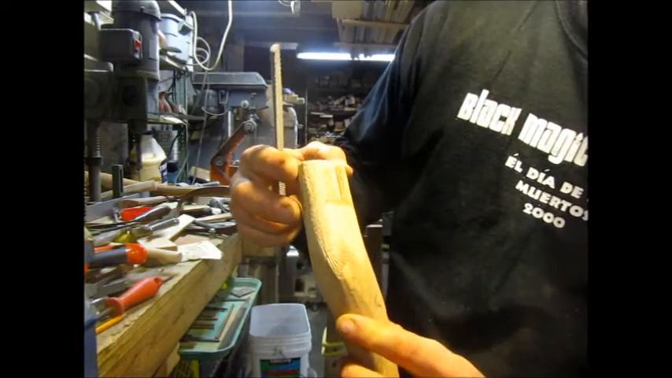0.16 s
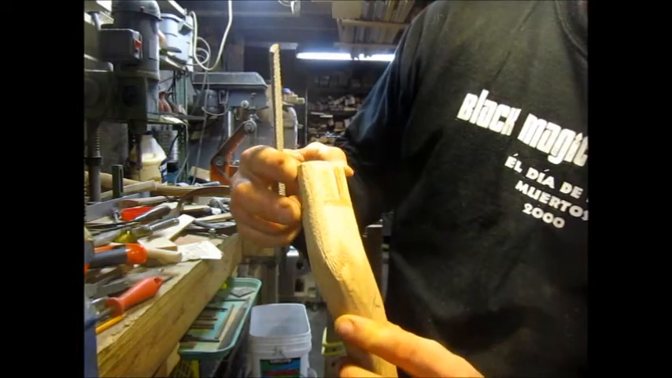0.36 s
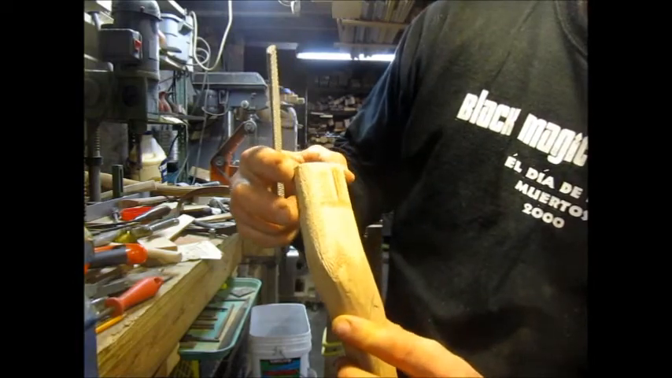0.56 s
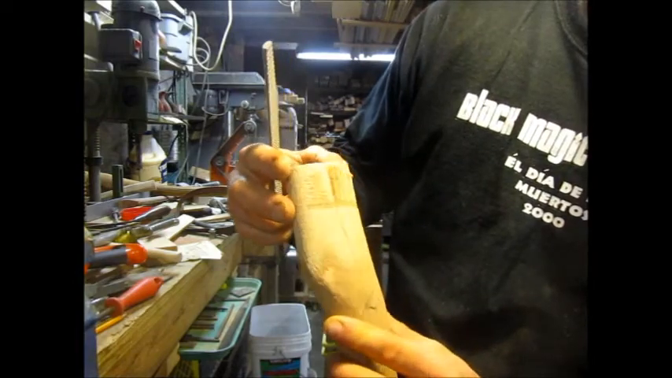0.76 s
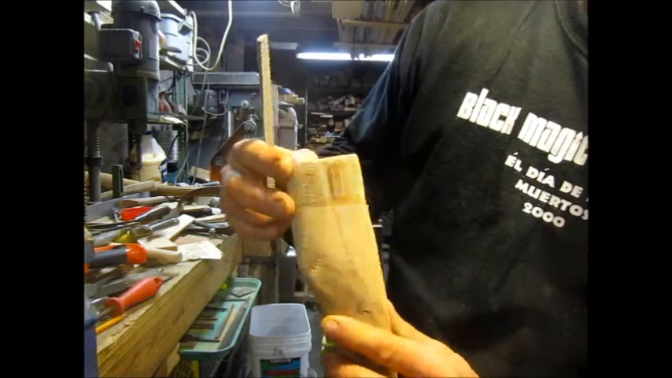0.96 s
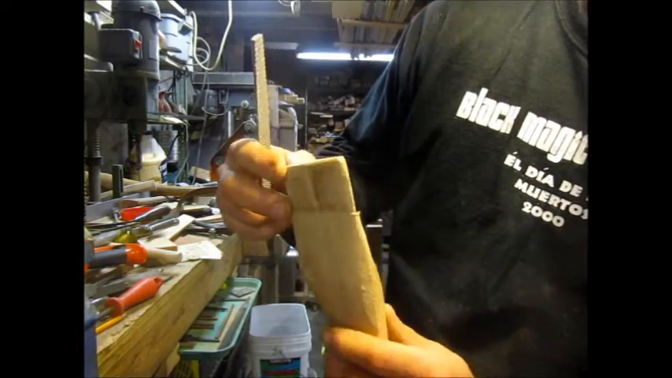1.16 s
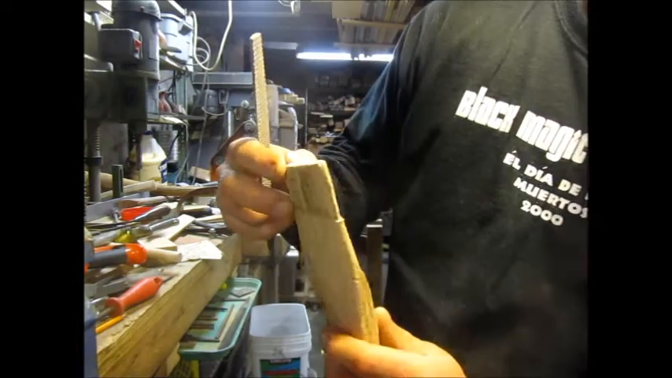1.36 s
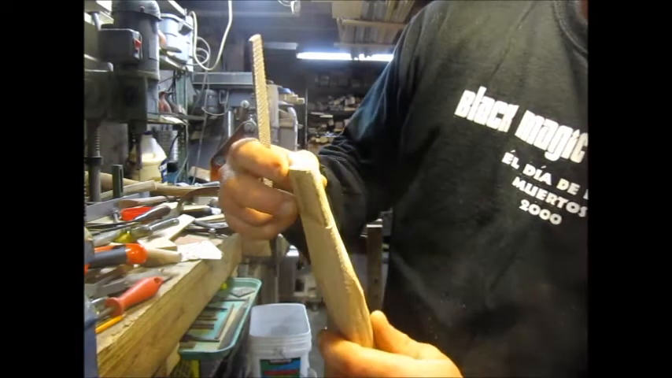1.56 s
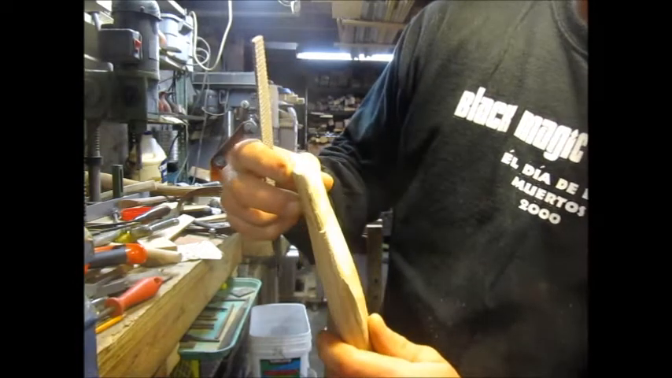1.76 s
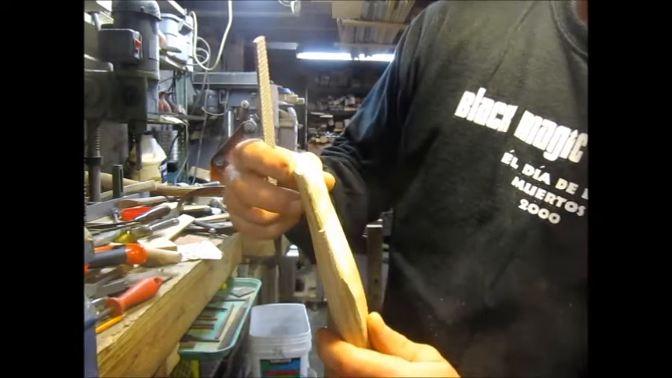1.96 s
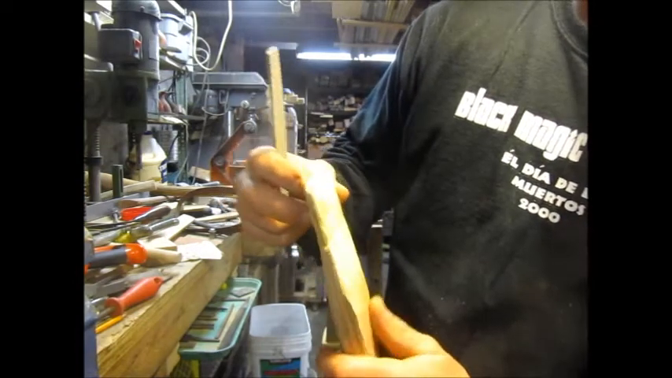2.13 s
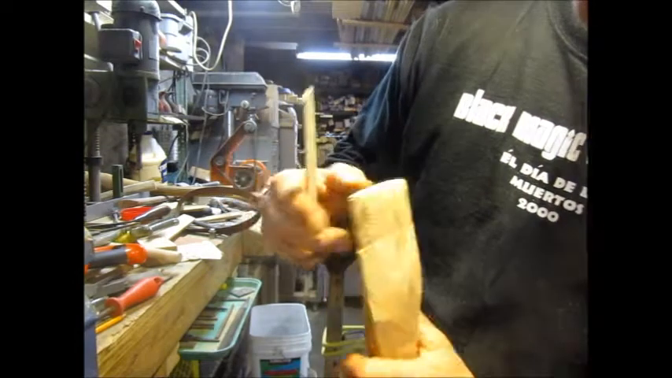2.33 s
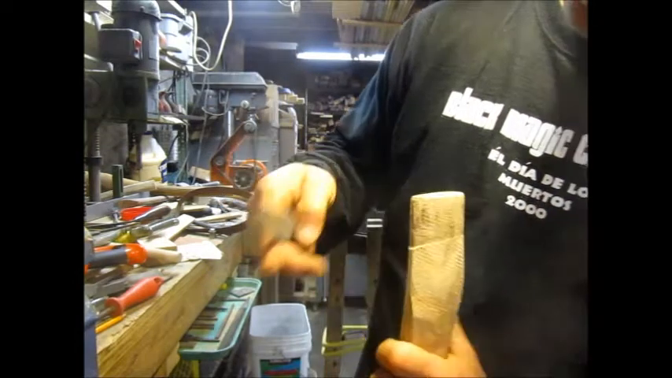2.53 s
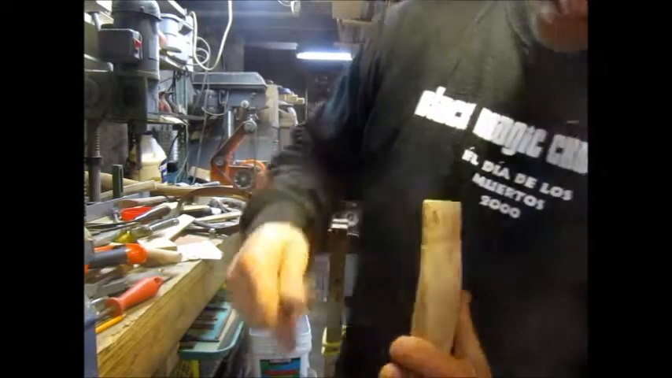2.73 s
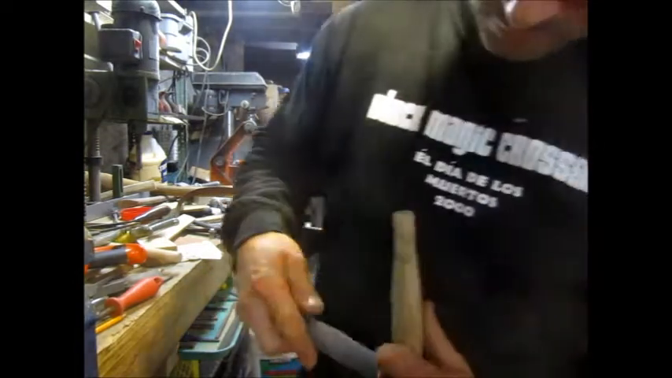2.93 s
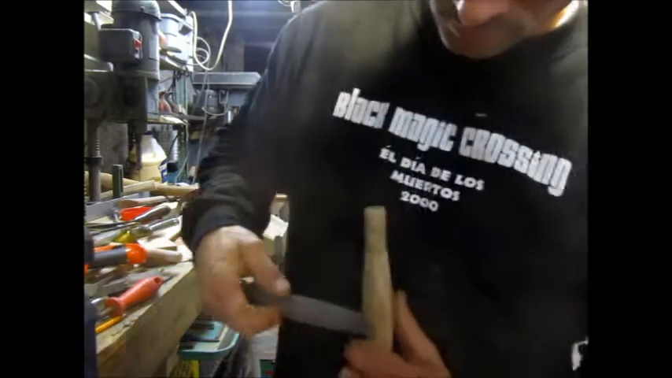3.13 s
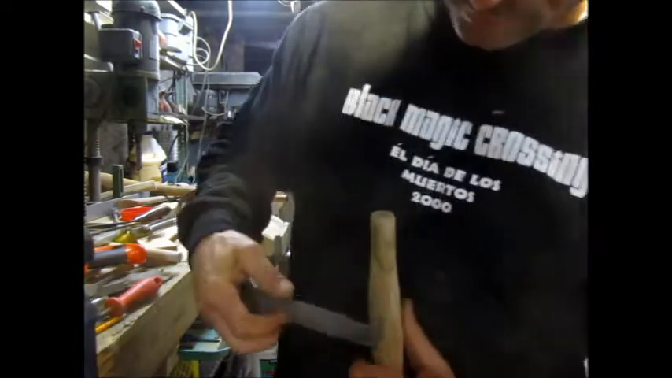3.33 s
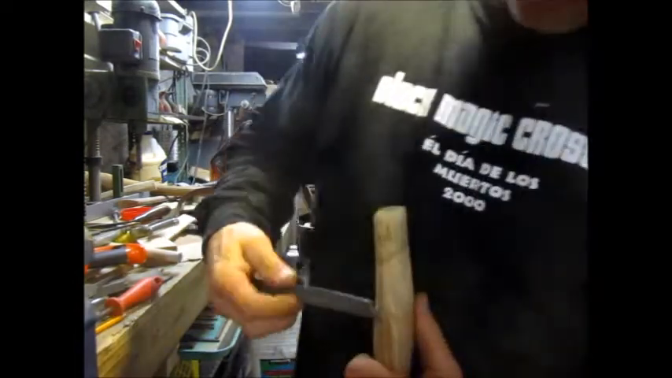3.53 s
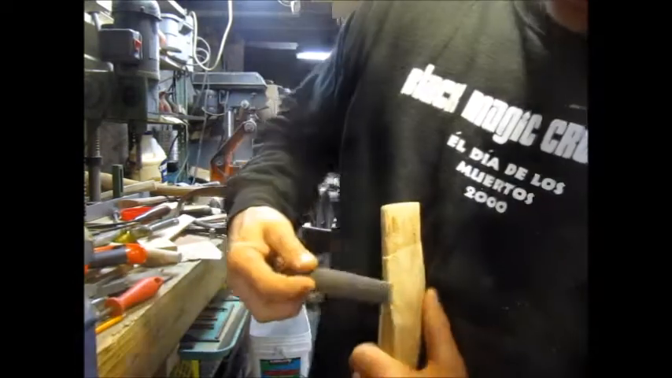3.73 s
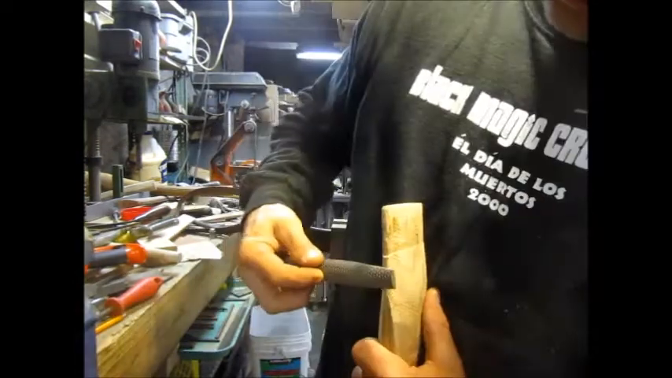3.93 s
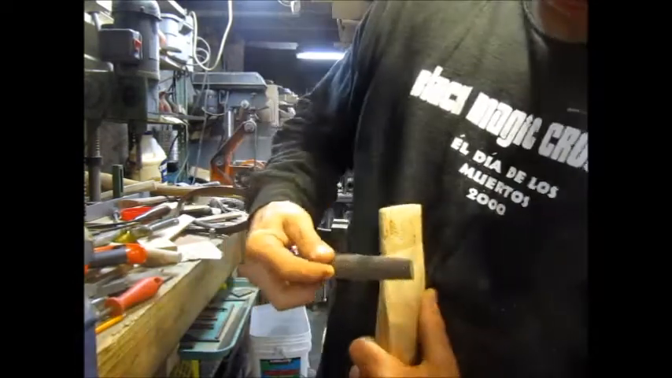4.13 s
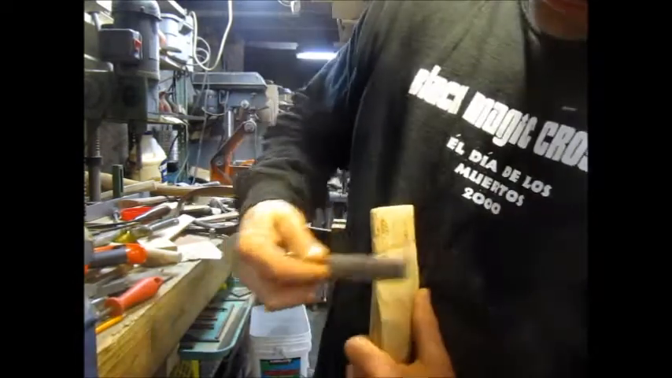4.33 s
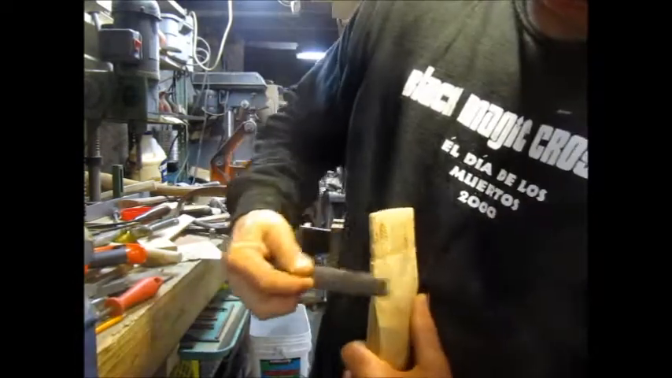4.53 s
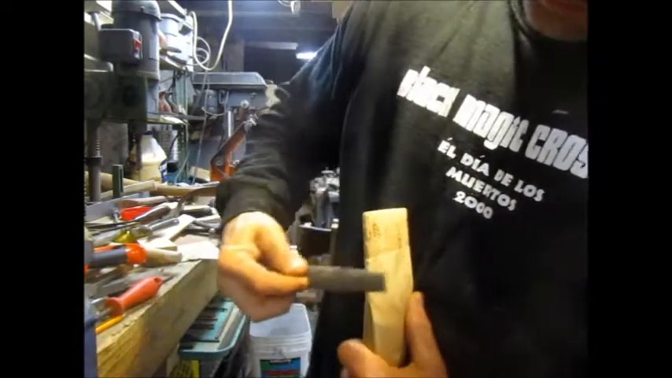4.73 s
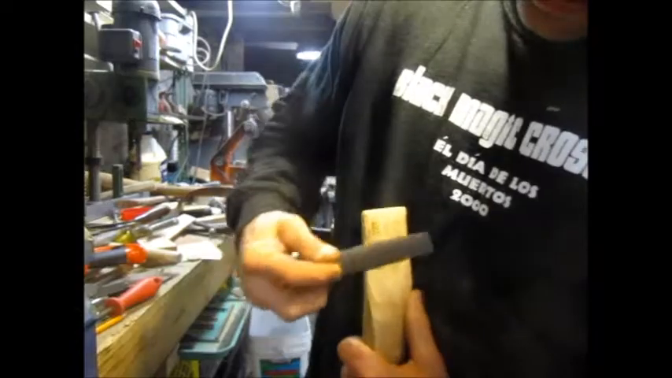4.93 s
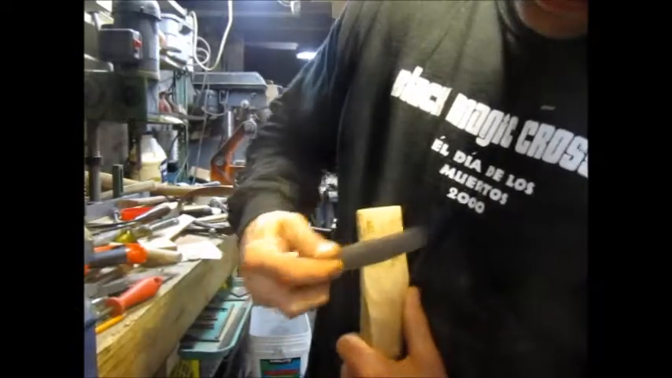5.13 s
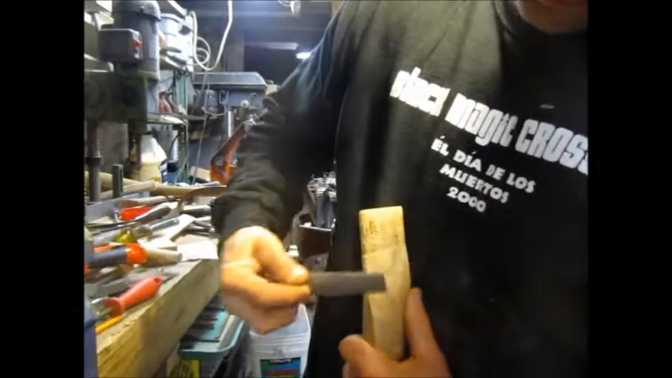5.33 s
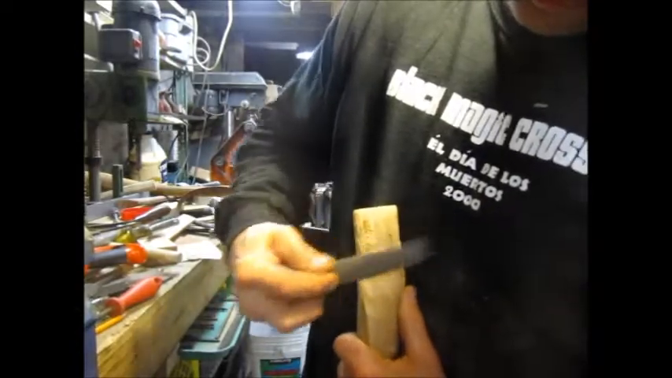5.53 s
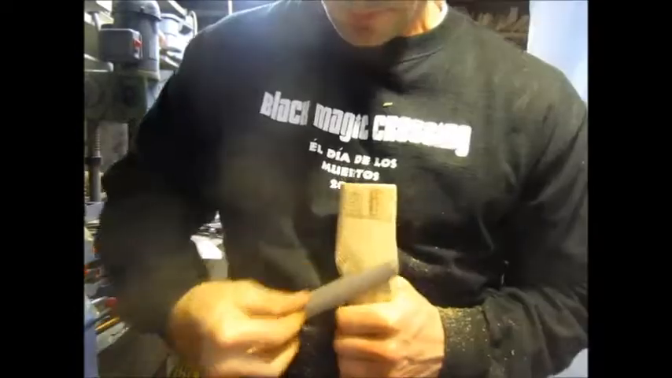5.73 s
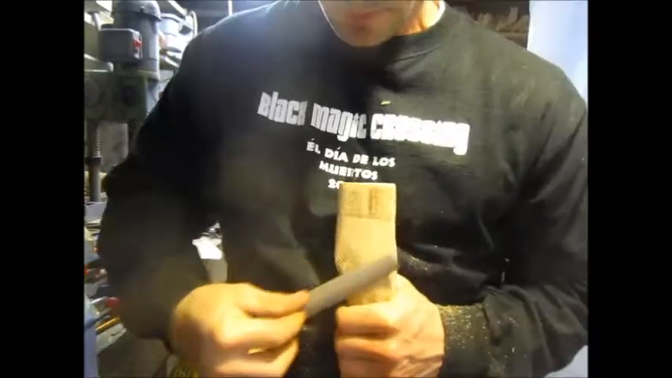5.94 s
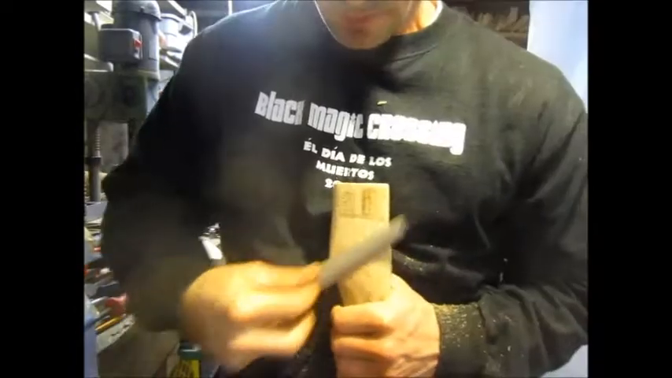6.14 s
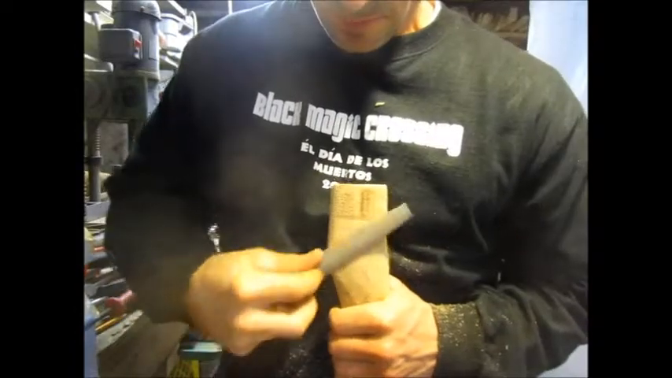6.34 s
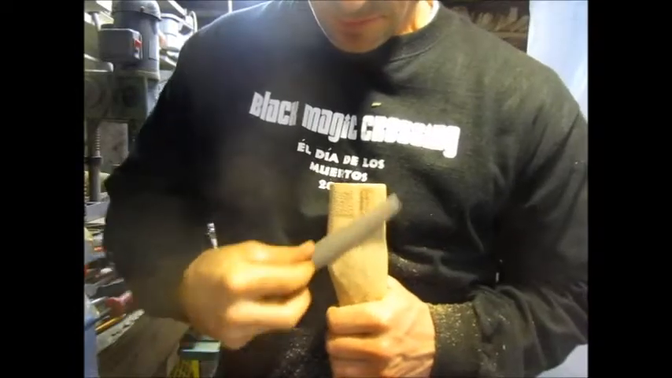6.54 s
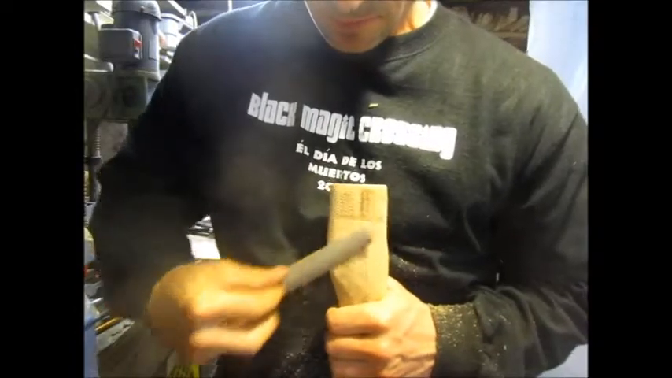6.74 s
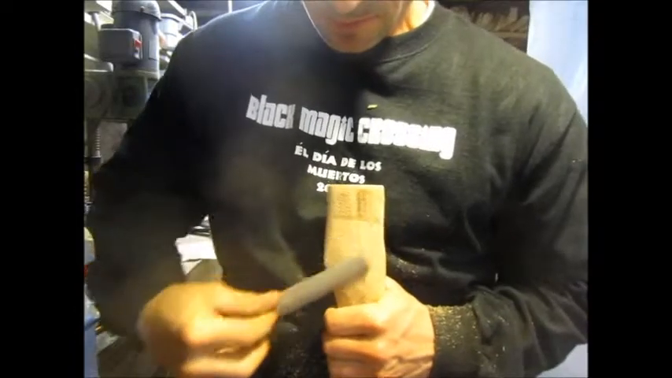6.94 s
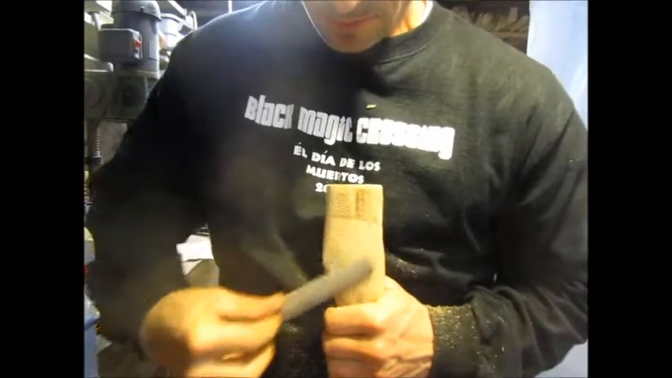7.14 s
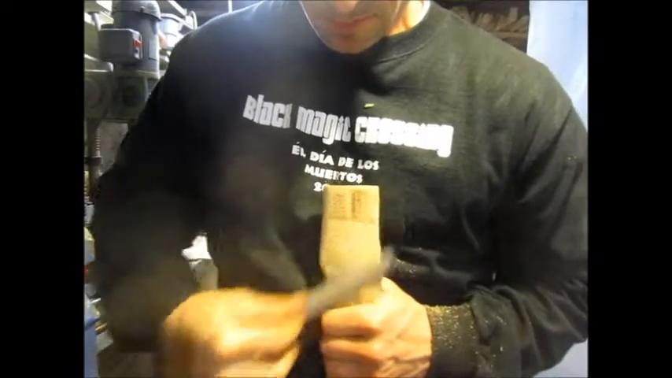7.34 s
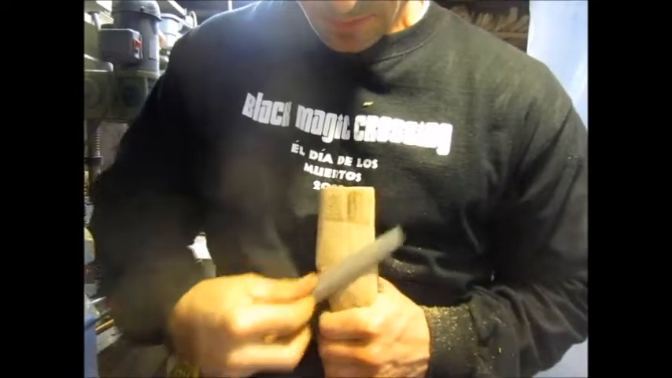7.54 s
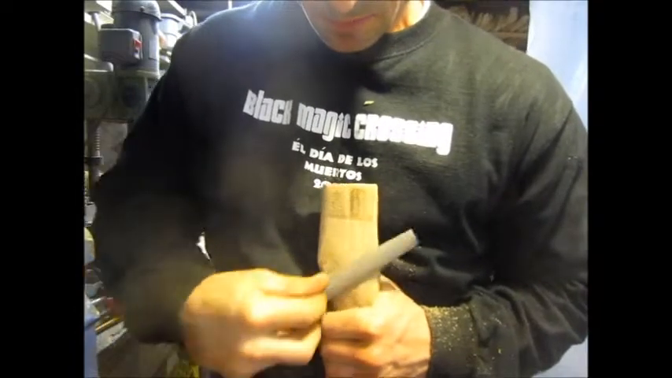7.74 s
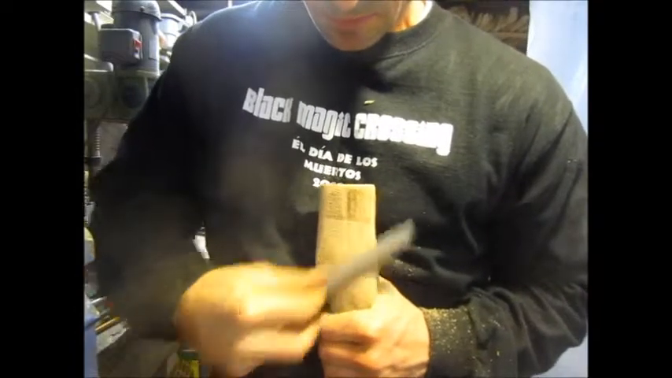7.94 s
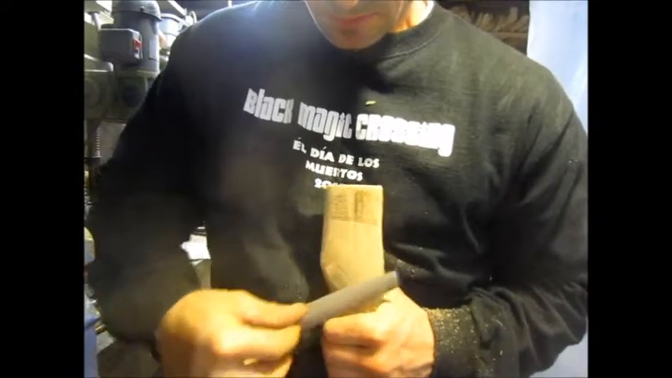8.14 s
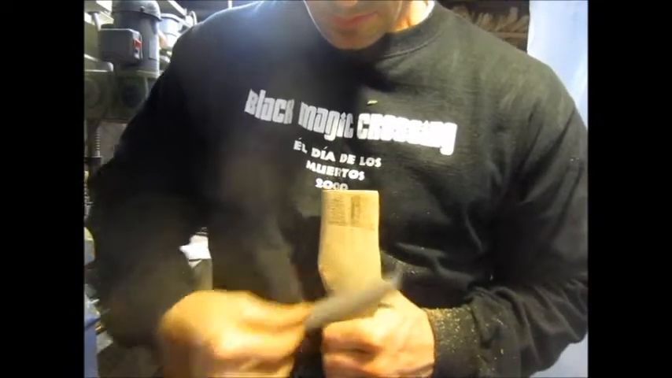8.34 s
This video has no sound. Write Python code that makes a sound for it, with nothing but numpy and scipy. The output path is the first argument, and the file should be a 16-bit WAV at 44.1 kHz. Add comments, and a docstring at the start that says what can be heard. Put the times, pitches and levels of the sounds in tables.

```python
"""A hand file shapes the end of a hand-held wooden handle in a small, cluttered workshop with a steady background.
First a sleeve rustles by cloth friction, the file is slapped and wiped on clothing, and its free blade sings.
Then come slow strokes that judder by coarse stick-slip, with single teeth catching and letting go.
Last, with a firmer grip, quick strokes rasp to and fro, dull on the pull and bright on the push.
Teeth and torn fibres excite resonances of wood and blade; file and cloth alike reflect off the clutter."""
import sys
import numpy as np
from scipy import signal
from scipy.fft import rfft, irfft
from scipy.io import wavfile

SR = 44100
rng = np.random.default_rng(int(sys.argv[2]) if len(sys.argv) > 2 else 0)


def master(y):
    """Save y as 16-bit WAV."""
    cut = np.clip(np.atleast_2d(y).T, -1, 1)
    pcm = np.round(cut * 32767)  # scale
    wavfile.write(sys.argv[1], SR, pcm.astype(np.int16))


N = 374497
TIME = np.arange(N) / SR
BINS = np.fft.rfftfreq(4096, 1 / SR)


def amp(db):
    """Decibel law: level difference to amplitude ratio."""
    return 10 ** (np.asarray(db) / 20)


def unit(x):
    """Normalisation: scales to rms 1."""
    return x / np.sqrt(np.mean(x ** 2) + 1e-20)


def read(points, hz):
    """Interpolation of a spectrum along a logarithmic frequency axis."""
    f, value = np.transpose(points)
    return np.interp(np.log(hz + 1), np.log(f + 1), value)


def add(mix, s, sound):
    """Superposition: adds a sound at time s."""
    part = mix[round(s * SR):][:len(sound)]
    part += sound[:len(part)]


def tinted(x, points):
    """Linear filtering: weights the spectrum of x by a dB curve."""
    gain = amp(read(points, np.fft.rfftfreq(len(x), 1 / SR)))
    return irfft(rfft(x) * gain, len(x))


def wander(n, step):
    """Slow random modulation of rms 1: straight lines between chance values every step points."""
    knots = rng.standard_normal(n + 2)
    return unit(np.interp(np.arange(n) / step, np.arange(n + 2), knots))


def response(db):
    """Minimum phase: the causal impulse response, of energy 1, whose gain over BINS has this dB shape."""
    log_gain = np.log(amp(np.r_[db, db[-2:0:-1]]))
    spectrum = np.exp(np.conj(signal.hilbert(log_gain)))[:len(db)]
    h = irfft(spectrum)
    return h / np.linalg.norm(h)


def bump(hz, width, db):
    """Resonance: dB shape of one peak, half as high at half a width to either side."""
    return db / (1 + (2 * (BINS - hz) / width) ** 2)


# workshop background, spectrum: (frequency [Hz], density [dB per Hz])
AIR_SPECTRUM = [(15, -51), (25, -37), (44, -6.5), (112, 0.5), (142, -6), (167, -2.5), (257, -3), (475, -6),
                (1420, -14.5), (2500, -18.5), (2700, -18.5), (4040, -31), (7890, -31), (12800, -60),
                (15000, -66)]
# stereo width of the background: (frequency [Hz], side against mid [dB])
AIR_WIDTH = [(60, -2.5), (150, 12), (380, 9), (950, 5), (2380, 1.5), (5980, 4), (15000, 0)]


def air(level_db=-54.5):
    """Diffuse field: steady workshop background of coloured noise, wide in the bass."""
    mid, side = (unit(tinted(rng.standard_normal(N), AIR_SPECTRUM)) for _ in range(2))
    side = tinted(side, AIR_WIDTH)
    return np.array([mid + side, mid - side]) * amp(level_db)


# reverberation: (frequency [Hz], time to fall by 60 dB [s])
DECAY_TIMES = [(200, 0.22), (530, 0.24), (1400, 0.2), (3700, 0.21), (9700, 0.16)]


def tail(gap_s=0.0033):
    """Reverberant decay: dense reflections off the clutter, each band dying at its own speed."""
    hz, t, z = signal.stft(rng.standard_normal(SR // 2), SR, nperseg=256)
    fall_db = -60 * t / read(DECAY_TIMES, hz)[:, None]
    h = signal.istft(z * amp(fall_db), SR, nperseg=256)[1]
    h = h * (np.arange(len(h)) / SR > gap_s)
    return h / np.linalg.norm(h)


# stereo width of the reflections: (frequency [Hz], side against mid before the side level [dB])
REFLECTION_WIDTH = [(100, -17), (300, -5.5), (700, -14), (1500, -5.5), (4000, -2), (9000, 4), (14000, 8)]


def room(x, wet_db, side_db, pan_db):
    """Reverberation: direct sound plus reflections at two close microphones."""
    mid = x + amp(wet_db) * signal.fftconvolve(x, tail())[:N]
    side = amp(side_db) * signal.fftconvolve(x, tinted(tail(), REFLECTION_WIDTH))[:N]
    return np.array([amp(pan_db / 2) * (mid + side), amp(-pan_db / 2) * (mid - side)])


# colour of rubbed cloth: (frequency [Hz], density [dB per Hz])
RUSTLE_SPECTRUM = [(150, 3), (600, 4), (2800, 2.5), (3900, -8), (5500, -1), (8500, -6.5), (11000, -16.5),
                   (14000, -30)]
# arm movements, bell-shaped swells: (middle [s], length of two standard deviations [s], relative level [dB])
ARM_MOVES = [(.9, 1.0, -62.5), (2.11, 0.12, -55), (2.22, 0.048, -56), (2.602, 0.86, -57),
             (3.123, 0.11, -53), (3.454, .25, -64.5), (5.413, 0.74, -54), (7.3, 5.9, -56)]


def sleeve(flutter_db=1, grain_db=1.5, rest_db=-72):
    """Friction noise: cloth rubs on cloth, swelling and fading with each move of the arm."""
    grains_db = grain_db * rng.standard_normal(N) + flutter_db * wander(N, 700)
    grains = rng.standard_normal(N) * amp(grains_db)
    power = amp(rest_db) ** 2  # an arm held almost still
    for middle, length, db in ARM_MOVES:
        swell = np.exp(-(2 * (TIME - middle) / length) ** 2 / 2)
        power = power + (amp(db) * swell) ** 2
    return unit(tinted(grains, RUSTLE_SPECTRUM)) * np.sqrt(power)


# partials of the free blade: (frequency [Hz], relative level [dB])
BLADE_PARTIALS = [(5954, -58), (7800, -64), (8764, -61), (9825, -65)]


def blade(level_db=1, waver_hz=50):
    """Free vibration: the blade sings faintly and unevenly as it slides through the fingers."""
    swell = np.interp(TIME, [2.56, 2.63, 2.648], [0, 1, 0])
    out = np.zeros(N)
    for hz, db in BLADE_PARTIALS:
        turns = np.cumsum(hz + waver_hz * wander(N, 120)) / SR
        out += amp(db + level_db + 2 * wander(N, 700)) * np.sin(2 * np.pi * turns)
    return swell * out


# resonances of handle and blade together: (frequency [Hz], width [Hz], lift [dB])
RESONANCES = [(385, 100, 1), (644, 97, 2), (737, 40, 4), (864, 47, 4.5), (1153, 130, 4), (1386, 60, 2.5),
              (1564, 14, 4.5), (1869, 45, 7.5), (2026, 230, 5), (2717, 110, 10), (2860, 114, 5),
              (3140, 67, 7), (3680, 73, 4.5), (4637, 143, 9.5), (4990, 240, 7.5), (5910, 230, 7),
              (7900, 200, 5.5), (8210, 200, 5), (9740, 1060, 9)]


def body(colour, drift=0.014):
    """Modal response: dB gain of handle and blade; the shifting grip detunes the low wooden modes most."""
    gain_db = read(colour, BINS)
    for hz, width, db in RESONANCES:
        detune = np.exp(drift * rng.standard_normal() * min(1, 900 / hz) ** 2)
        gain_db = gain_db + bump(hz * detune, width, db)
    return gain_db


# colour of struck cloth: (frequency [Hz], density [dB per Hz])
CLOTH_SPECTRUM = [(40, -15), (200, -14.5), (450, -7), (680, -1.5), (1100, 0.5), (1900, -1), (2250, -3),
                  (2800, -4), (3900, -16), (5500, -10), (9000, -10), (10500, -18.5), (13000, -23),
                  (16000, -54)]
# file against clothing: (time [s], rise [s], decay [s], relative level [dB])
CLOTH_BLOWS = [(1.618, 0.0078, .006, -51.5), (2.648, 0.039, 0.011, -40.5), (2.876, 0.0063, .004, -39),
               (2.8845, 0.00061, 0.007, -9.5), (3.166, 0.014, 0.02, -29), (3.378, 0.0056, 0.009, -50.5)]


def slaps(crack=5, spread_s=0.0032, ring_share=0.28):
    """Impact and dispersion: a sharp slap on cloth cracks the blade, a soft wipe rubs fibres; both ring the
    blade."""
    out, t = np.zeros(N), np.arange(SR // 4) / SR
    blade_db = ring_share * sum(bump(*mode) for mode in RESONANCES if mode[0] > 1000)
    # bending waves disperse in steel: the treble arrives first and the bass a moment later
    lag_s = spread_s / np.sqrt(1 + BINS / 900)
    flex = irfft(np.exp(-2j * np.pi * np.cumsum(lag_s) * BINS[1]))
    soft_tilt_db = read([(60, -14), (170, 8), (400, 6.5), (800, -3.5), (4000, 1), (14000, -14)], BINS)
    for s, rise, decay, db in CLOTH_BLOWS:
        softness = min(rise / 0.0093, 1)  # a slow rise is a soft contact
        shape = np.minimum(t / rise, 1) * np.exp(-np.maximum(t - rise, 0) / decay)
        blow = shape * rng.standard_normal(len(t)) * (0.77 + 0.3 * softness)
        add(blow, 0, crack * (1 - softness) * flex)
        ring = response(read(CLOTH_SPECTRUM, BINS) + blade_db + softness * soft_tilt_db)
        add(out, s, amp(db) * signal.fftconvolve(blow, ring))
    return out


# colour of the handle held loosely: (frequency [Hz], density [dB per Hz])
LOOSE_GRIP = [(50, -36), (110, -17), (165, -3), (260, 0.5), (660, -2), (900, -10.5), (1300, -11.5),
              (2400, -19.5), (4000, -22), (4900, -23), (8000, -18), (9000, -28), (10500, -29),
              (12500, -43.5), (15500, -66)]
# single teeth catching as the file lands or creeps: (time [s], relative level [dB])
TOOTH_CATCHES = [(3.975, -30.5), (4.002, -30.5), (4.439, -20.5), (4.642, -20.5), (4.664, -22.5),
                 (4.728, -27), (4.776, -20.5), (4.934, -19.5), (4.968, -26), (4.987, -15.5), (5.0, -14.5),
                 (5.068, -14), (5.216, -18.5), (5.238, -15.5), (5.275, -18.5), (5.316, -23), (5.476, -16.5),
                 (5.594, -22.5), (7.114, -18)]


def catches(level_db=16, grit_s=.002, hold_s=0.00323, grit=.09):
    """Stored strain released: a tooth digs in with a pinch of grit, holds, and lets go with a dull knock."""
    out, t = np.zeros(N), np.arange(600) / SR
    for s, db in TOOTH_CATCHES:
        hardness_db = -5.0 + .5 * (db + 20.5)  # light touches are duller
        tilt_db = read([(200, -3.5), (750, -0.5), (2500, -4.5), (8000, hardness_db)], BINS)
        ring = response(body(LOOSE_GRIP) + tilt_db)
        release = np.exp(-((t - hold_s) / .00008) ** 2) / 3
        crunch = grit * rng.standard_normal(len(t)) * (t / grit_s) ** 2 * np.exp(-t / grit_s)
        knock = signal.fftconvolve(release + crunch, ring)
        add(out, s, amp(db + level_db) * knock / np.linalg.norm(knock))
    return out


# the more blade juts past the wood, the more freely it rings: (time [s], lift [dB])
BLADE_OVERHANG = [(4, 2.5), (5.7, 0.5), (7.2, 2), (7.9, 4), (8.05, 6.5), (8.4, 3)]


def overhang(s):
    """Boundary condition: lift in dB of the free blade's ring at time s."""
    return np.interp(s, *np.transpose(BLADE_OVERHANG))


def bite(speed, breakaway=.45, held=0.6, jolt=0.07, jolt_s=0.016):
    """Static friction: the teeth hold until the hand overcomes it, then break free with a jolt."""
    since = (np.arange(len(speed)) - np.argmax(speed > breakaway)) / SR
    return np.where(since < 0, held * speed ** 2, speed ** 2 + jolt * np.exp(-abs(since) / jolt_s))


def stroke(start, length, peak, tone, colour, slip_hz, jitter, slip_share, snap_share, rub,
           grain_db, contact_db, spot_db, speed_db, chatter_db):
    """Stick-slip: in one pass, each slip thumps the wood and tears a clump of fibres."""
    presence_db, treble_db, spot_hz = tone
    n = int(length * SR)
    # peak is the moment of top speed as a share of the length
    speed = np.sin(np.pi * np.interp(np.arange(n) / n, [0, np.clip(peak, .1, .9), 1], [0, .5, 1]))
    slip_rate = slip_hz * (.5 + .5 * speed) * np.exp(jitter * wander(n, 90))
    cycles = np.cumsum(slip_rate) / SR + rng.random()
    slips = np.diff(np.floor(cycles), prepend=0) * amp(2 * rng.standard_normal(n))
    # a slip is soft: little treble
    thumps = unit(signal.lfilter(*signal.butter(1, 1500, fs=SR), slips)) * 0.28
    clumps = rub + np.exp(-(cycles % 1) / snap_share)
    fibres = unit(rng.standard_normal(n) * clumps * amp(grain_db * rng.standard_normal(n)))
    soft = signal.lfilter(*signal.butter(1, 2000, fs=SR), fibres)
    hiss = fibres - soft
    # faster teeth cut more sharply, so the treble swells in mid-stroke; it flares where fibres are brittle
    sharpness = amp(speed_db * (speed - 0.95) + wander(n, 186.0))
    drive = np.sqrt(slip_share) * thumps + np.sqrt(1 - slip_share) * soft + hiss * sharpness
    pressure = bite(speed) * amp(chatter_db * wander(n, 293))  # uneven wood makes the pressure waver
    tilt_db = read([(650, 0), (1500, presence_db), (3100, presence_db), (4800, treble_db)], BINS)
    # every pass touches another spot, which favours one wood resonance and other overtones
    touch_db = bump(spot_hz, spot_hz * 0.065, spot_db) + contact_db * wander(len(BINS), 11)
    free_db = bump(2740, 340, overhang(start))  # the jutting blade
    ring = response(body(colour) + tilt_db + touch_db + free_db)
    return signal.fftconvolve(drive * pressure, ring)


# slow strokes: (start [s], length [s], top speed at [share of length], relative level [dB], treble [dB])
SLOW_STROKES = [(4.007, .074, 0.91, -29, -8.5), (4.112, .125, .36, -20, -2), (4.489, 0.13, 0.33, -20.5, -1),
                (4.746, .11, 0.9, -23, -2.5), (4.875, .047, .16, -37, 9), (4.881, .14, 0.82, -34, -6),
                (5.024, .135, .61, -19.5, 0.5), (5.164, 0.089, 0.82, -34.5, -7),
                (5.291, .16, .54, -20, 0.5)]


def slow_filing(level_offset_db=4.0):
    """Coarse stick-slip: slow strokes on the loosely held handle judder."""
    out = np.zeros(N)
    for start, length, peak, level_db, treble_db in SLOW_STROKES:
        tone = 1 + 0.6 * treble_db, treble_db, 520  # presence [dB], treble [dB], favoured resonance [Hz]
        sound = stroke(start, length, peak, tone, LOOSE_GRIP, slip_hz=165, jitter=.35, slip_share=.54,
                       snap_share=.29, rub=.38, grain_db=3, contact_db=1.0, spot_db=3.0,
                       speed_db=14.5, chatter_db=2.05)
        add(out, start, amp(level_db + level_offset_db) * sound)
    return out


# colour of the handle held firmly: (frequency [Hz], density [dB per Hz])
FIRM_GRIP = [(60, -33), (150, -16.5), (280, -8), (470, -0.5), (800, -0.5), (1300, -2), (2000, -5.5),
             (2400, -13), (3000, -11), (3900, -22), (5000, -23), (7500, -19.5), (8800, -32), (12000, -40.5),
             (15500, -82)]
# the teeth slide on the pull and cut on the push: (presence [dB], treble [dB]), each before pressure and overhang
PULL_TONE = (-2.9, -2.3)
PUSH_TONE = (0.55, 5.8)
# quick strokes, pull and push in turn, before run-up and run-out are added:
# (start [s], length [s], relative level [dB], wood resonance favoured by the touched spot [Hz])
QUICK_STROKES = [(5.637, 0.077, -22.5, 989), (5.724, 0.088, -20, 1142), (5.873, 0.078, -24.5, 1170),
                 (5.966, 0.076, -22, 683), (6.115, 0.084, -23, 730), (6.219, 0.08, -21, 673),
                 (6.363, 0.082, -22.5, 807), (6.467, 0.084, -23.5, 1190), (6.609, 0.079, -23, 765),
                 (6.727, 0.074, -22.5, 1240), (6.844, 0.088, -23, 870), (6.942, 0.081, -22, 669),
                 (7.077, 0.068, -23.5, 820), (7.168, 0.091, -23, 646), (7.289, 0.082, -23, 690),
                 (7.389, 0.094, -23, 730), (7.526, 0.083, -23, 1360), (7.625, 0.092, -21, 720),
                 (7.777, 0.085, -19.5, 708), (7.891, 0.092, -20, 935), (8.026, 0.079, -24.5, 1240),
                 (8.151, 0.085, -23.5, 1210), (8.277, 0.13, -23.5, 1166)]


def quick_filing(level_offset_db=3.0, usual_db=-23, run_up=.22, run_out=.18):
    """Fine stick-slip: quick strokes rasp, dull on the pull and bright on the push."""
    out = np.zeros(N)
    for k, (start, length, level_db, spot_hz) in enumerate(QUICK_STROKES):
        presence_db, treble_db = PUSH_TONE if k % 2 else PULL_TONE
        # pressing harder than usual adds wood tone but little hiss; a jutting blade rings more and hisses less
        dulling_db = 1.07 * (level_db - usual_db) + 0.27 * overhang(start)
        tone = presence_db + 0.39 * overhang(start), treble_db - dulling_db, spot_hz
        # run-up and run-out are shares of the tabled length: gathering speed, slowing down
        full_length = length * (1 + run_up + run_out)
        sound = stroke(start, full_length, .51, tone, FIRM_GRIP, slip_hz=482.8, jitter=.3, slip_share=0.45,
                       snap_share=0.26, rub=0.67, grain_db=2.5, contact_db=2.0, spot_db=6.0,
                       speed_db=4.5, chatter_db=1.33)
        add(out, start - run_up * length, amp(level_db + level_offset_db) * sound)
    return out


def scene():
    """Direct-to-reverberant ratio: the work is near the microphones, the clothing farther and more reverberant."""
    clothing = amp(1.5) * (sleeve() + blade() + slaps())
    clothing = room(clothing, wet_db=-4.0, side_db=-7, pan_db=-0.5)
    work = catches() + slow_filing() + quick_filing()
    work = room(work, wet_db=-10.0, side_db=-11.5, pan_db=-0.17)
    return air() + clothing + work


def record(dry, threshold_db=-36.5, slope=0.23, recover_db_per_s=10, attack_s=0.013, edge_hz=16000):
    """Dynamic compression: gain control turns loud sounds down and recovers slowly; then the band limit."""
    keep = np.exp(-1 / (attack_s * SR))
    power = signal.lfilter([1 - keep], [1, -keep], (dry ** 2).mean(0))
    power_db = 10 * np.log10(power + 1e-12)
    wanted_db = slope * np.maximum(power_db - threshold_db, 0)
    # a running maximum on a rising ramp lets the reduction fall no faster than the recovery rate
    ramp_db = TIME * recover_db_per_s
    duck_db = np.maximum.accumulate(wanted_db + ramp_db) - ramp_db
    low_pass = signal.firwin(255, edge_hz, window=("kaiser", 9), fs=SR)
    return signal.oaconvolve(dry * amp(-duck_db), low_pass[None], "same")


dry = scene()
out = record(dry)
master(out)
```